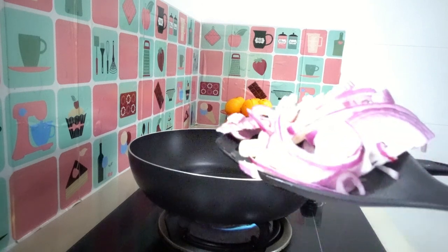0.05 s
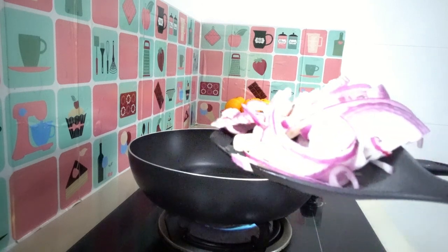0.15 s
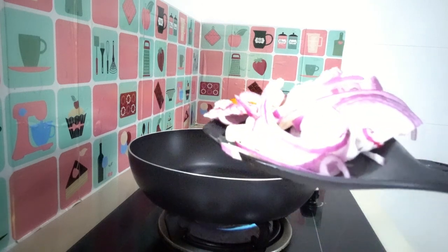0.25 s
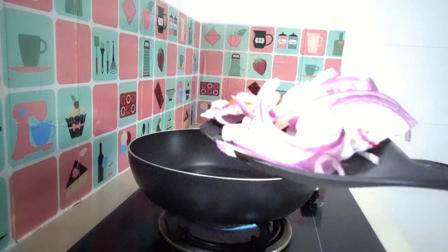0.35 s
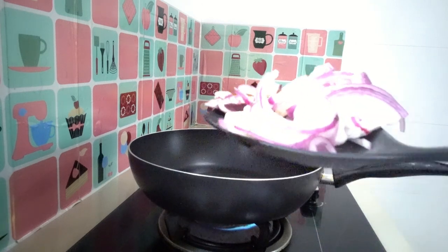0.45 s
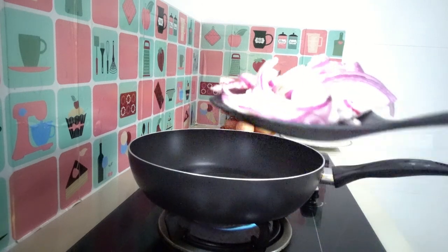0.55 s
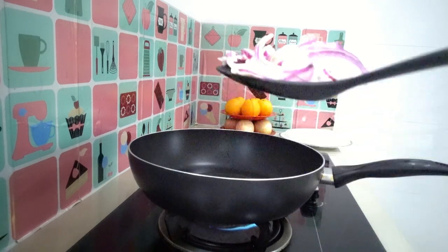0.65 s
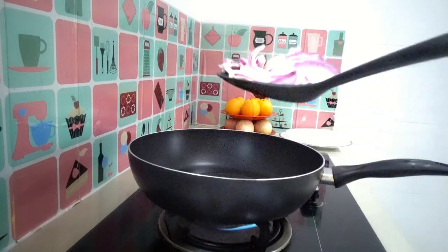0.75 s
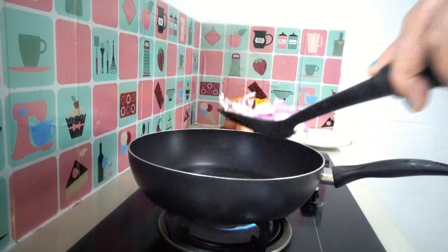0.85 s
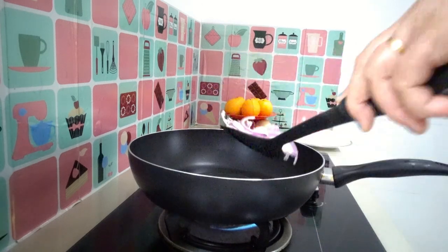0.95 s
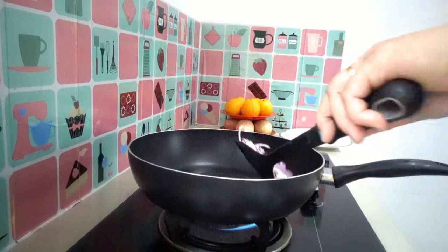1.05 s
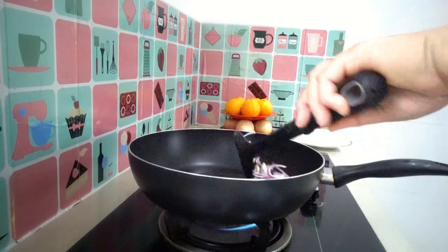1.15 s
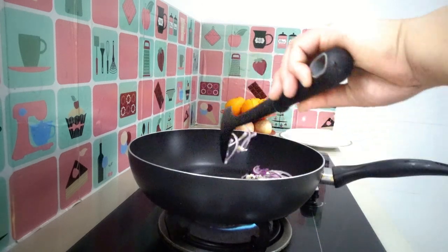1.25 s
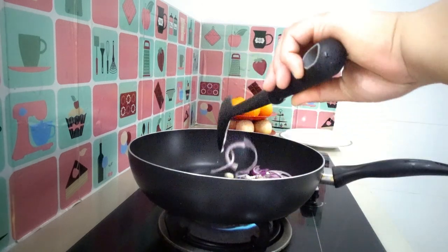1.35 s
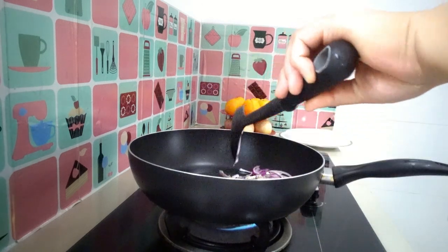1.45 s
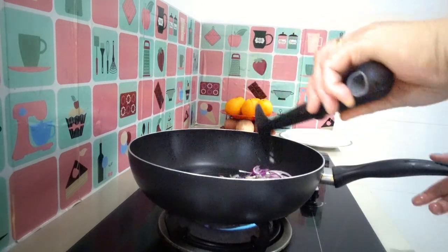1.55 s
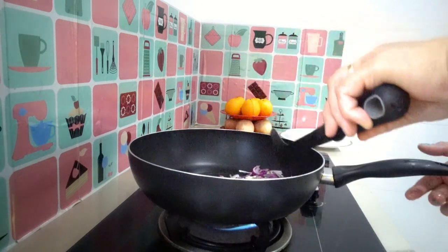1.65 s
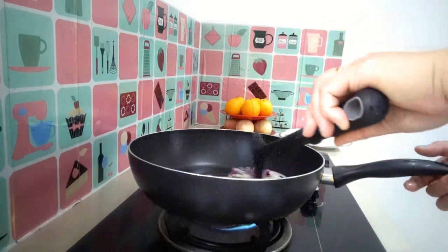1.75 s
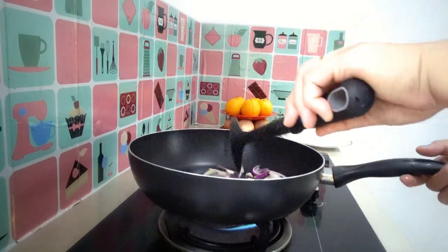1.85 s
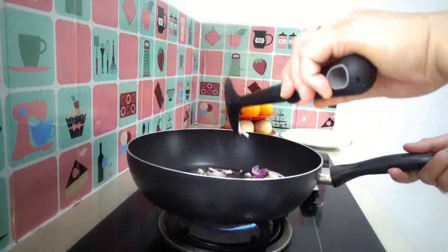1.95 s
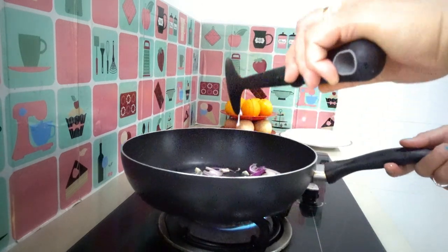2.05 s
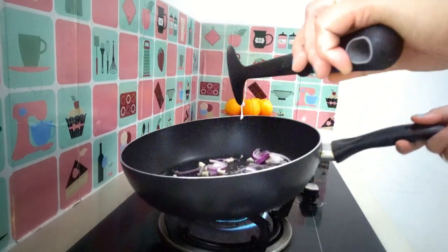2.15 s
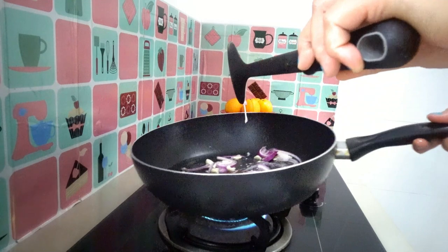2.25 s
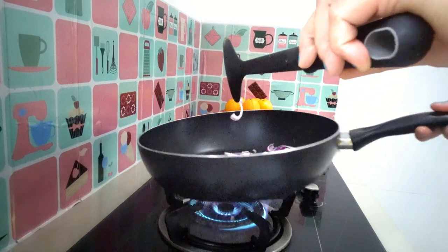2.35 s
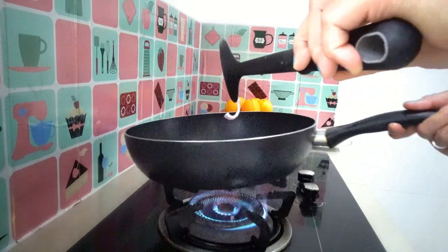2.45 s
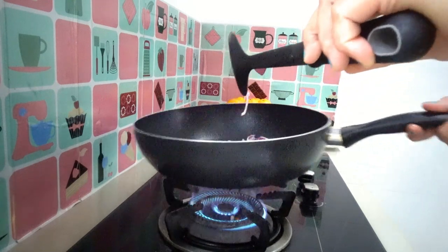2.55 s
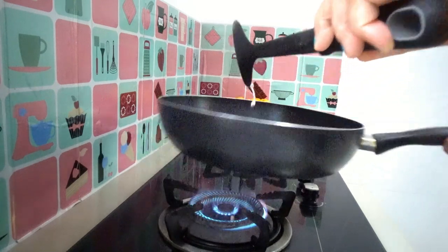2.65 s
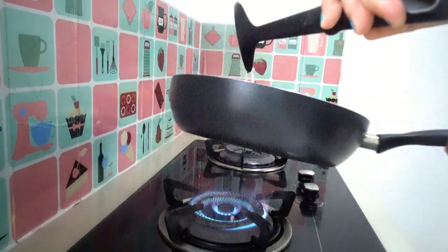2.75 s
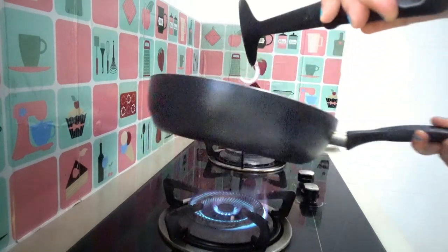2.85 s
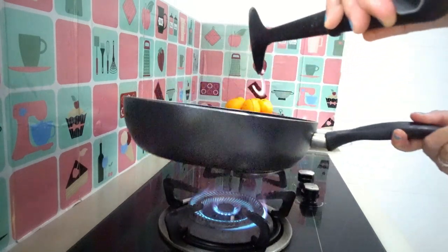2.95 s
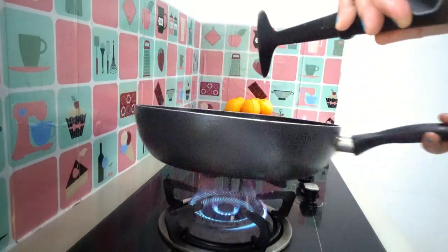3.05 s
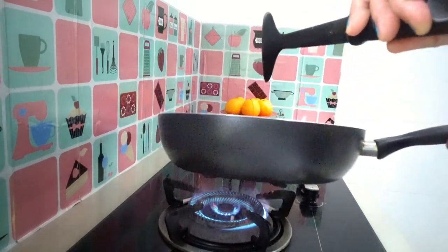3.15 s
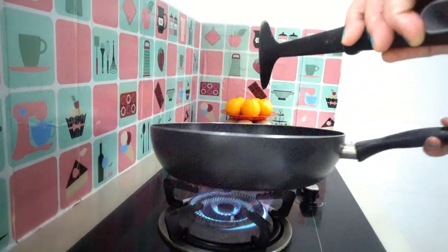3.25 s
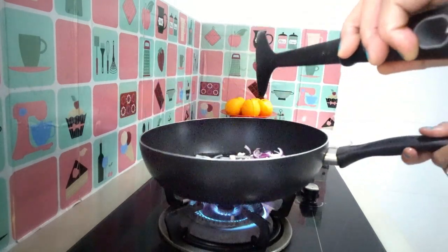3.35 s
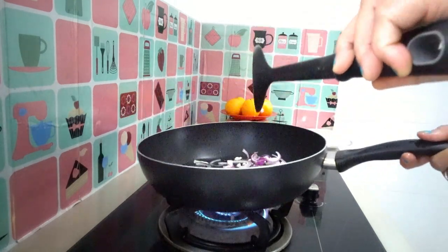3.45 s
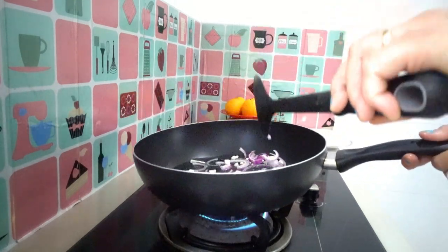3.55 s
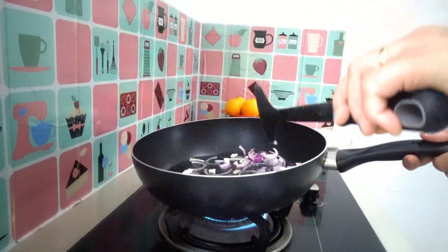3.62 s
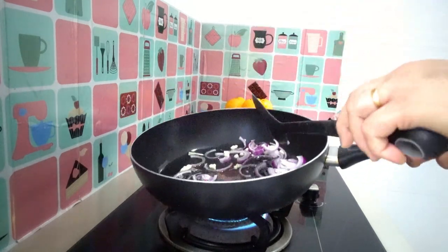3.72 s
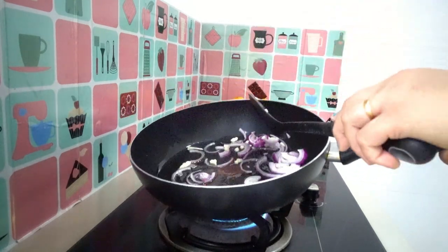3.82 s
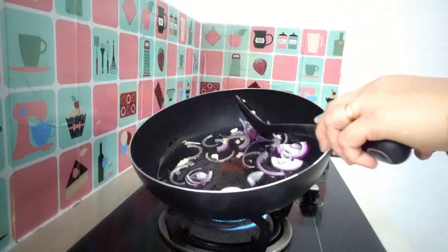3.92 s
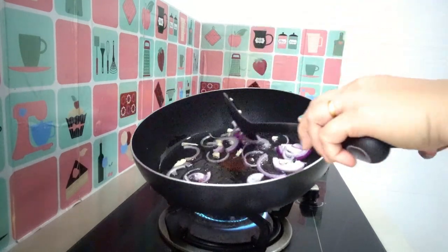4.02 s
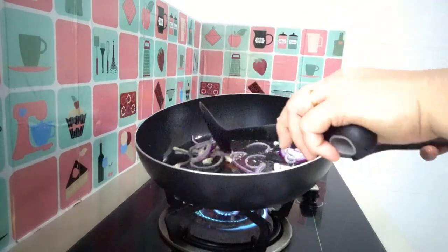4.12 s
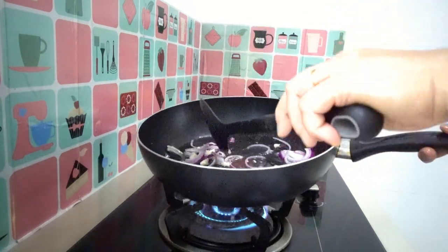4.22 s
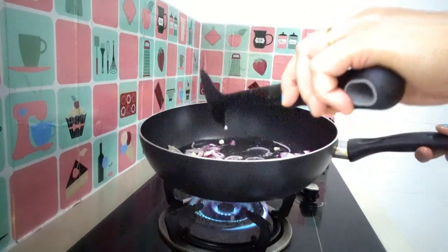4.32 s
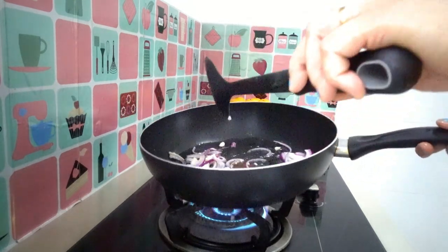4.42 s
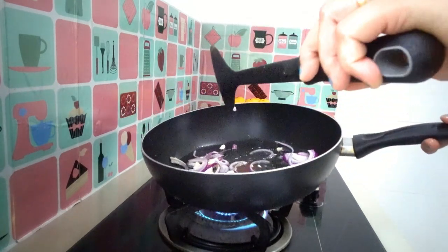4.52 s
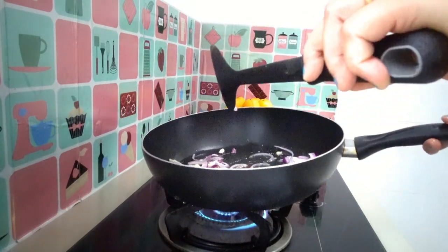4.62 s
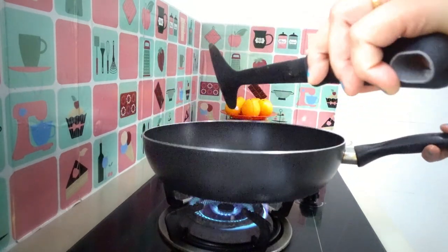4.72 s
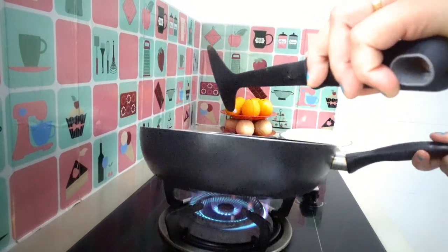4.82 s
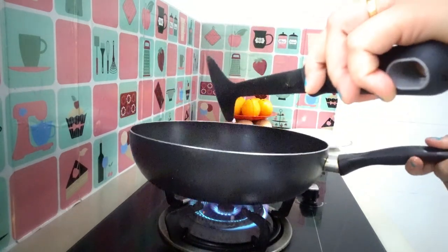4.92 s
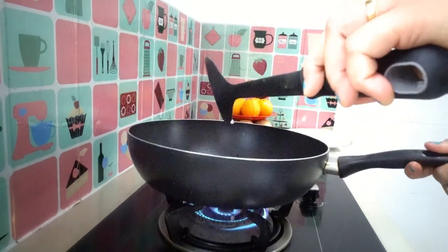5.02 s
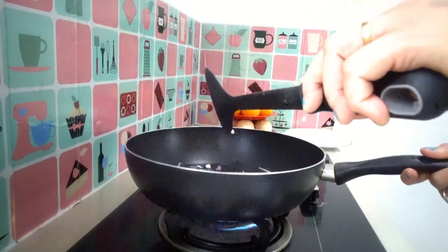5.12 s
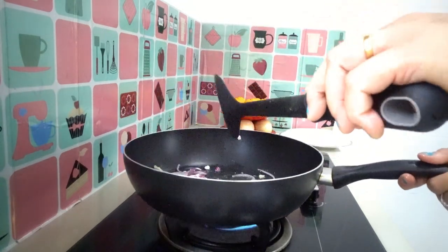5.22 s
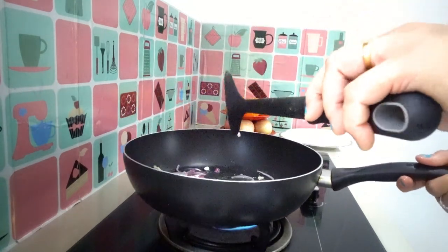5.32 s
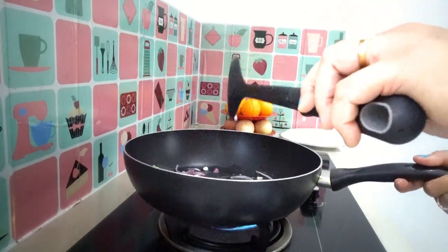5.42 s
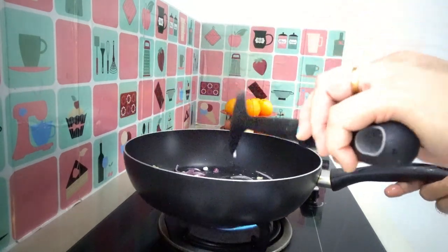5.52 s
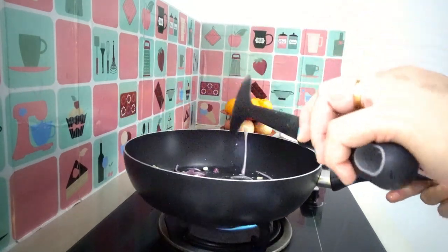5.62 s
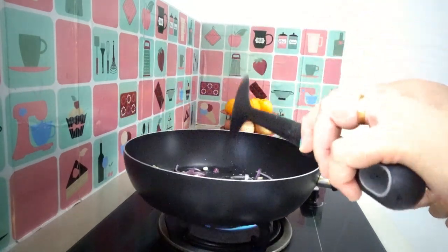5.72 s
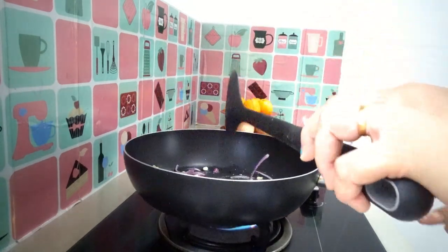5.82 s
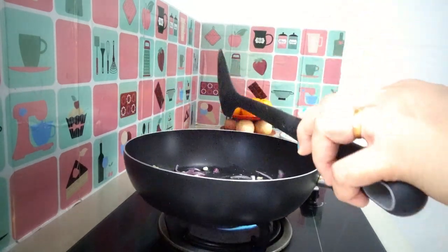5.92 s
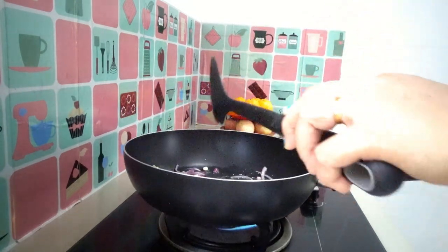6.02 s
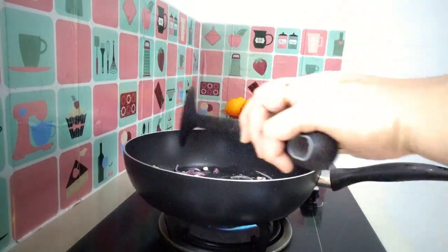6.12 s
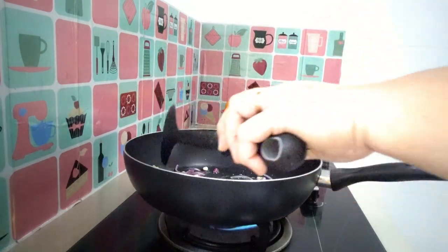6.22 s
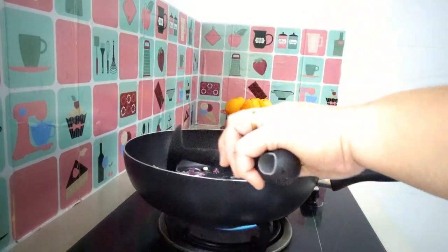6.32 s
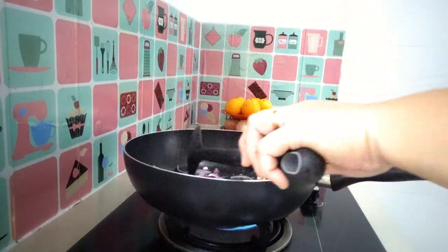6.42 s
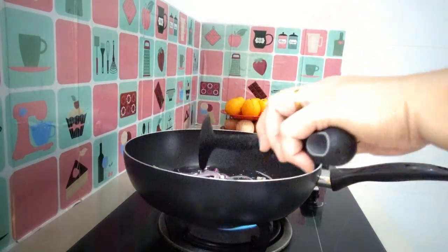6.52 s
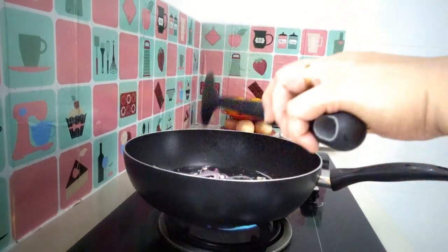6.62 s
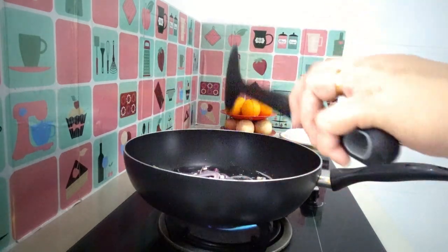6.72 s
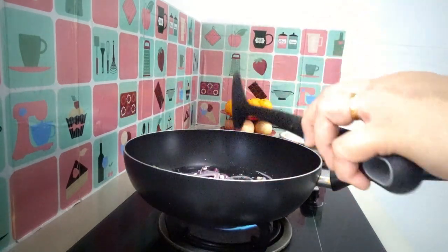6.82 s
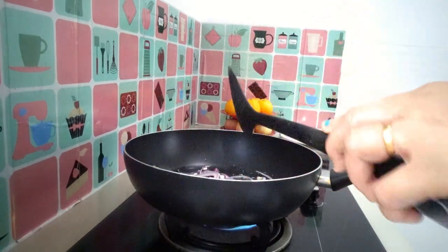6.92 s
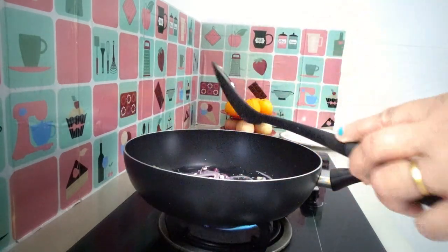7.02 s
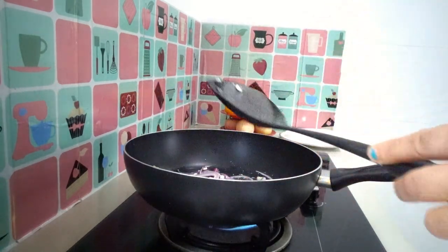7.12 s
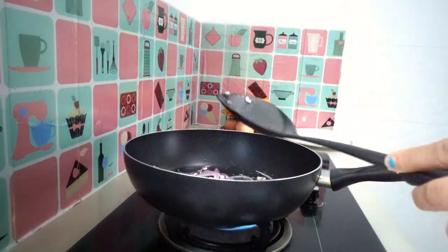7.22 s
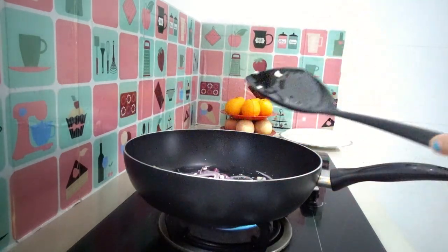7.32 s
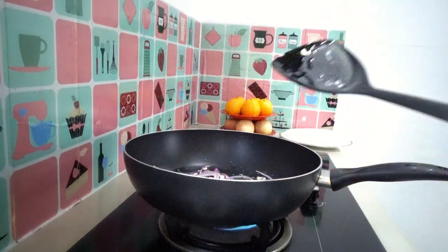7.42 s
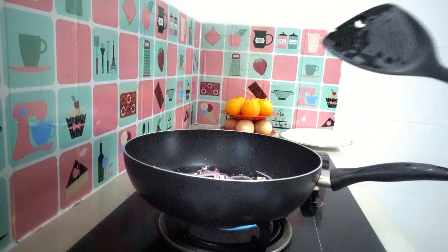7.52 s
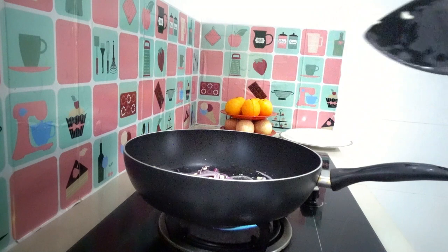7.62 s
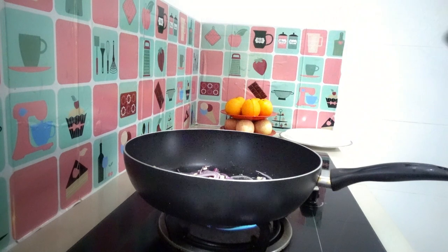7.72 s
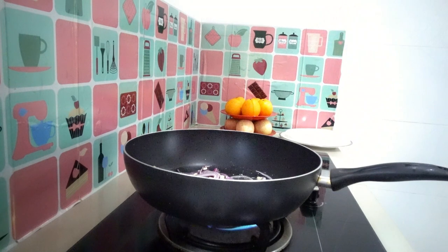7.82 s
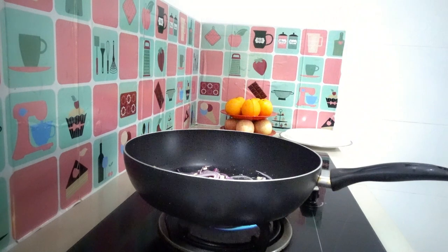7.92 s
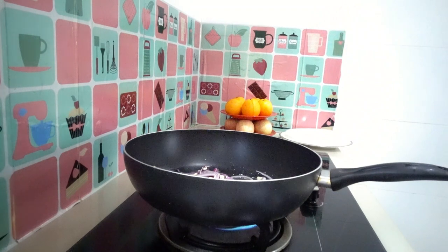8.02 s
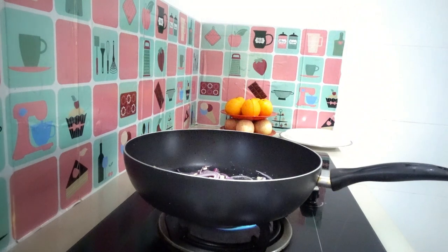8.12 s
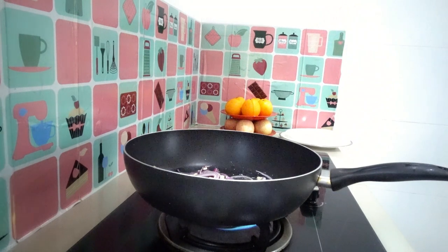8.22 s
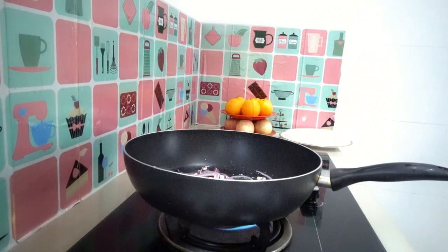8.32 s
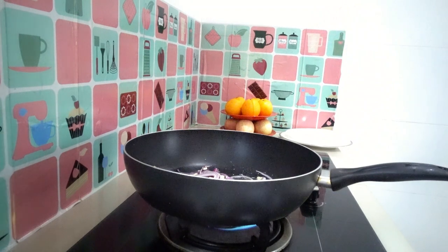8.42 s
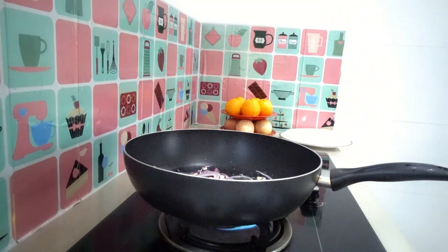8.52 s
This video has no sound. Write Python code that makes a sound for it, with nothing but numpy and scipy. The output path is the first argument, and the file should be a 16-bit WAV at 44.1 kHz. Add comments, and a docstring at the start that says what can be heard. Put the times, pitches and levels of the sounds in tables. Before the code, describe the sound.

A spatula taps a pan, then onion fries with crackling pops as the pan knocks and scrapes on a stove grate.

```python
"""A gas burner rushes softly under the dying echo of a clatter, in a small tiled kitchen.
A spatula raps the pan and drops sliced onion into hot oil; its water boils out, sizzling and spitting
from then on. The pan, lifted to swirl the oil, clatters and skids back on the iron grate four times.
The tiles ring after each blow."""
import sys
import numpy as np
from scipy import signal
from scipy.fft import rfft, irfft, next_fast_len
from scipy.io import wavfile
from scipy.ndimage import uniform_filter1d, minimum_filter1d, map_coordinates

SR = 44100
rng = np.random.default_rng(int(sys.argv[2]) if len(sys.argv) > 2 else 0)


def inscribe(sig):
    """Save sig as 16-bit PCM at rate SR to the path in sys.argv[1].

    A 1-D sig is mono; a 2-D sig holds one channel per row.
    Samples are clipped to [-1, 1] before scaling.
    """
    pcm = np.round(np.clip(np.atleast_2d(sig).T, -1, 1) * 32767)
    wavfile.write(sys.argv[1], SR, pcm.astype(np.int16))


N = 377496

# how hard the onion boils: (time [s], level [dB])
BOIL_CURVE = [(1.15, -46), (1.7, -39.5), (1.93, -31.0), (2.25, -32), (2.95, -34), (3.4, -38), (3.68, -40),
              (3.98, -34), (4.55, -35), (5.3, -36), (6.0, -38), (6.2, -38), (6.32, -39), (6.62, -34.5),
              (7.3, -38), (7.7, -37.5), (8.3, -38.5), (8.55, -36)]
# bursts of sizzle, the first being the noisy wash of the pan strike: (time [s], length [s], level [dB])
SIZZLE_FLURRIES = [(1.105, 0.5, -30.5), (3.023, 0.2, -34.5), (3.91, .18, -46), (4.35, .4, -38.5),
                   (6.403, 0.13, -36), (6.476, 0.14, -30.5), (6.868, .14, -41), (7.414, 0.23, -40),
                   (7.865, 0.17, -37), (8.434, 0.2, -37.5)]
# coarse steam bursts: (frequency [Hz], level [dB])
SPUTTER_SPECTRUM = [(100, -60), (310, -44), (385, -6.5), (490, -13), (550, -23), (720, -5.5), (1130, -5),
                    (1500, -5), (1750, -0.5), (2400, 1.5), (4000, 1), (6000, 0), (9000, -6.5), (16000, -18)]
# fine steam bursts: (frequency [Hz], level [dB])
FIZZ_SPECTRUM = [(1000, -39), (3500, -2.5), (6500, 0.5), (9000, 0.5), (13000, -0.5), (16000, -2.5)]
ONION_IN_S, ONION_RISE_S = 1.11, 0.02

def frying():
    """Water boils out of the onion as coarse sputter and fine fizz; both swell in flurries."""
    t = np.arange(N) / SR
    boil_db = np.interp(t, *np.transpose(BOIL_CURVE))
    excess_db = boil_db - boil_db.mean()
    flurry = np.sqrt(sum((amp(db) * swell(np.maximum(t - s, 0) / length)) ** 2
                         for s, length, db in SIZZLE_FLURRIES))
    # sputter grows less than fizz: a harder boil is brighter
    coarse = np.hypot(amp(boil_db.mean() - 1.5 + 0.76 * excess_db), flurry)
    fine = np.hypot(amp(boil_db + 3), flurry * amp(excess_db + 0.5))
    sputter = coarse * bubbles(SPUTTER_SPECTRUM, per_s=1500, spread_db=2.5, wet_db=7.5)
    fizz = fine * bubbles(FIZZ_SPECTRUM, per_s=4300, spread_db=2.0, wet_db=4.5)
    in_oil = np.clip((t - ONION_IN_S) / ONION_RISE_S, 0, 1)
    flicker = amp(0.96 * wobble(22) + 0.9 * wobble(130))
    return in_oil * flicker * (sputter + fizz)


def bubbles(spectrum, per_s, spread_db, wet_db):
    """Tiny steam bursts of unequal size, in the wash of their own echoes."""
    count = int(per_s * N / SR)
    onsets = rng.integers(0, N, count)
    sizes = amp(spread_db * np.minimum(rng.standard_normal(count), 2.4))
    # each microphone gets its own strength and sign
    bursts = np.array([np.bincount(onsets, sizes * rng.uniform(-1.1, 1, count), N) for _ in range(2)])
    wash = amp(wet_db) * rng.standard_normal((2, N))
    return stereo(unit(bursts) + wash, lambda hz: amp(along(spectrum, hz)))


def swell(age, rise=0.15, fall_db=17):
    """Envelope of a flurry; age and rise are shares of its length."""
    return np.minimum(age / rise, 1) * amp(-fall_db * np.maximum(age - rise, 0))


# loudest drops: (time [s], level [dB], sputter re snap [dB])
LOUD_SPITS = [(3.9262, -17, -7), (4.0166, -19, -0.5), (5.752, -24, 1), (5.8962, -28, 5.5),
              (6.0983, -16.5, -27), (6.1501, -13, -17), (6.408, -13, -12), (6.8628, -14.5, -17),
              (6.889, -20, -0.5), (7.3937, -15, -15), (7.5654, -17.5, -11), (8.021, -15.5, -17)]
# a bursting drop: (frequency [Hz], level [dB])
SNAP_SPECTRUM = [(200, -17), (1500, -13), (4000, -4.5), (9000, -0.5), (16000, 0)]
SMALL_SPITS_PER_S = 4

def spits():
    """Drops burst with a snap and a short spray; small ones come at random."""
    out, t = np.zeros((2, N)), np.arange(SR // 10) / SR
    envelope = 1.5 * blow(t, t60_s=0.016, rise_s=0.0002) + 0.45 * blow(t, t60_s=0.08, rise_s=0.001)
    frying_s = N / SR - ONION_IN_S
    small = [(ONION_IN_S + frying_s * when, -24 - 2 * softness, -3)
             for when, softness in rng.random((int(SMALL_SPITS_PER_S * frying_s), 2))]
    for s, db, sputter_db in LOUD_SPITS + small:
        snap = noise(SNAP_SPECTRUM, len(t))
        sputter = amp(sputter_db + 2.5) * noise(SPUTTER_SPECTRUM, len(t))
        add(out, s, kitchen(amp(db - 8) * envelope * (snap + sputter), wet_db=-3))
    return out


# pan set down: (time [s], thud [dB], clank [dB], clank resonance [Hz], ring [dB])
PAN_KNOCKS = [(2.103, -27.5, -19.5, 1110, -38), (2.153, -18, -21, 1150, -33), (3.473, -19, -14, 1980, -38),
              (3.512, -17.5, -16, 1230, -25), (3.558, -22.5, -19, 1280, -42),
              (3.633, -23.5, -22.5, 1160, -37), (4.847, -17, -11.5, 1460, -18.5),
              (4.904, -24, -15.5, 1480, -41), (5.211, -21.5, -12, 1410, -48),
              (5.247, -15.5, -19.5, 1090, -22.5), (5.423, -28.5, -26, 1180, -48),
              (6.887, -50, -39, 820, -60)]
GRATE_LAG_S = 0.0095

def clatter():
    """Every knock is double: pan on grate, then loose grate on hob."""
    out = np.zeros((2, N))
    for s, thud_db, clank_db, clank_hz, ring_db in PAN_KNOCKS:
        on_grate = contact(thud_db, clank_db, clank_hz, ring_db)
        on_hob = contact(thud_db - 1.5, clank_db - 1, clank_hz, ring_db - 1)
        add(out, s, kitchen(on_grate, wet_db=-1.5))
        add(out, s + GRATE_LAG_S, kitchen(on_hob, wet_db=-1.5))
    return out


# thumped hob: (frequency [Hz], level [dB])
THUD_SPECTRUM = [(25, -2), (90, -39), (180, -12.5), (300, -0.5), (400, 1), (485, 3.5), (560, -6.5),
                 (650, 3), (880, -4.5), (1120, -3.5), (1600, -4), (5000, -42)]
# loose grate: (frequency [Hz], level [dB])
CLANK_SPECTRUM = [(100, -42), (500, -25), (900, -2), (1130, -6), (1700, -5), (2400, -2), (2750, -5.5),
                  (3200, -6), (5000, -7.5), (7300, -11.5), (10000, -19.5), (16000, -33)]
# ringing iron: (frequency [Hz], level [dB], t60 [s])
GRATE_MODES = [(1990, -10, 0.062), (2430, -16, 0.17), (3108, -8, 0.5), (3698, 1.5, 0.2), (4550, -4, 0.081),
               (4740, 0, 0.063)]

def contact(thud_db, clank_db, clank_hz, ring_db):
    """One contact thumps the hob, clanks the grate and leaves its iron ringing."""
    t = np.arange(SR // 3) / SR
    thud = amp(thud_db + 4) * blow(t, t60_s=0.066, rise_s=0.0014) * noise(THUD_SPECTRUM, len(t))
    iron = stereo(rng.standard_normal((2, len(t))),
                  lambda hz: amp(along(CLANK_SPECTRUM, hz)) * (1 + 3.46 * resonance(hz, clank_hz, 115)))
    clank = amp(clank_db + 5.5) * blow(t, t60_s=0.046, rise_s=0.0012) * iron
    return thud + clank + amp(ring_db) * ring(GRATE_MODES, t, waver=0.0052)


# pan sliding on the grate: (time [s], length [s], rasp [dB], resonance [Hz], width [Hz], chatter [dB])
PAN_SKIDS = [(2.04, 0.11, -33.5, 456, 400, -59), (3.535, 0.23, -31.5, 1260, 300, -22),
             (4.871, 0.14, -22, 1546, 240, -18), (5.04, .15, -34, 1505, 160, -34),
             (5.299, 0.21, -40, 1250, 350, -23.5)]
SLIPS_PER_S, CHATTER_GAP_S, CHATTER_FADE_DB_PER_S = 600, 0.027, 38

def skids():
    """The pan sticks and slips along the iron and rocks from prong to prong, ever more weakly."""
    out = np.zeros((2, N))
    for s, length_s, rasp_db, centre_hz, width_hz, chatter_db in PAN_SKIDS:
        n = int(length_s * SR)
        friction = rng.standard_normal((2, n))
        slips = rng.random(n) < SLIPS_PER_S / SR
        rasp = stereo(friction * (0.5 + 10 * slips), lambda hz: resonance(hz, centre_hz, width_hz) ** 2)
        add(out, s, kitchen(amp(rasp_db) * rasp * signal.windows.tukey(n, 0.5), wet_db=-10.5))
        for age_s in np.arange(0, length_s, CHATTER_GAP_S):
            db = chatter_db - CHATTER_FADE_DB_PER_S * age_s + rng.normal(0, 2.6)
            rock = contact(thud_db=db - 9.5, clank_db=db, clank_hz=centre_hz, ring_db=db - 27)
            jitter_s = CHATTER_GAP_S * rng.random() / 2
            add(out, s + age_s + jitter_s, kitchen(rock, wet_db=1))
    return out


# spatula and onion on the pan: (time [s], ring [dB], crack [dB], roll-off [Hz])
PAN_TAPS = [(1.112, -14.5, -18.5, 10000), (1.378, -22, -15, 900), (1.401, -37, -21.5, 6000),
            (1.520, -60, -29, 4000), (1.824, -27.5, -54, 553), (3.116, -31.5, -31, 910)]
# ringing pan: (frequency [Hz], level [dB], t60 [s])
PAN_MODES = [(525.5, -5.5, 0.13), (568, -9.5, 0.096), (778.5, -10.5, 0.26), (1129, -4.5, 0.088),
             (1364, -18, 0.15), (1856, 2, 0.24), (1912, -7, 0.18), (2350, -10, 0.25), (2580, -17, .3),
             (3333, -7, 0.39), (3440, -19, 0.22), (4860, -13.5, .25), (5780, -20, .3), (6480, -17, 0.38),
             (7180, -18, 0.27)]
# crack of a tap: (frequency [Hz], level [dB])
CRACK_SPECTRUM = [(100, -61), (500, -1), (1500, -6), (2300, 1), (2750, -4), (3300, -0.5), (7000, -2.5),
                  (11000, -3.5), (16000, -25)]

def spatula():
    """Taps ring the thin pan, which radiates little bass; each has its own brightness, dull or sharp."""
    out, t = np.zeros((2, N)), np.arange(SR // 2) / SR
    for s, ring_db, crack_db, rolloff_hz in PAN_TAPS:
        modes = amp(ring_db) * ring(PAN_MODES, t, waver=0.0079)
        crack = amp(crack_db) * blow(t, t60_s=0.083, rise_s=0.0003) * noise(CRACK_SPECTRUM, len(t))
        band = signal.butter(2, [250, rolloff_hz], "bandpass", fs=SR)
        add(out, s, kitchen(signal.lfilter(*band, modes + crack), wet_db=-5))
    return out


# gas flame: (frequency [Hz], level [dB])
FLAME_SPECTRUM = [(30, -40), (75, -40), (112, -17), (180, -7.5), (300, -7), (400, -4), (750, -1),
                  (1050, -3.5), (2100, -8.5), (3000, -11.5), (3900, -18), (7000, -19.5), (9000, -27),
                  (16000, -34)]
# burner hum and jet whistle: (frequency [Hz], width [Hz], level [dB])
JET_PEAKS = [(486, 24, 8), (6164, 30, -4), (6900, 450, -4.5)]

def burner():
    """The flame's steady rush, its hum and the thin whistle of its jet."""
    jet = stereo(rng.standard_normal((2, N)), lambda hz: sum(
        amp(db) * resonance(hz, centre, width) ** 2 for centre, width, db in JET_PEAKS))
    return amp(-49) * noise(FLAME_SPECTRUM, N) + amp(-57) * jet


def fading_echo(t60_s=1.46):
    """The room still rings from a clatter a moment earlier."""
    t = np.arange(N) / SR
    spectrum = [(110, -9), (250, -11), (550, -3), (1100, -8), (2100, -2), (4500, -16.5), (15000, -35)]
    return amp(-38 - 60 * t / t60_s) * noise(spectrum, N)


# decay of the tiled room: (frequency [Hz], t60 [s])
TILE_DECAY = [(150, 1), (500, 0.98), (1500, 1.0), (4000, 0.92), (8000, 0.51), (15000, 0.24)]

def kitchen(sound, wet_db):
    """A sound plus the echo of the tiled walls; the treble dies first."""
    wash = stereo(rng.standard_normal((2, SR)), np.ones_like)
    hz, t, bands = signal.stft(wash, SR, nperseg=256)
    decay = blow(t, t60_s=along(TILE_DECAY, hz)[:, None], rise_s=0.001)
    tail = signal.istft(bands * decay, SR, nperseg=256)[1]
    response = amp(wet_db) * tail / np.linalg.norm(tail[0])
    response[:, 0] = 1  # direct path
    return signal.fftconvolve(sound, response, axes=1)


# likeness of left and right: (frequency [Hz], correlation [ratio])
MIC_COHERENCE = [(200, 0.99), (550, 1), (1200, 0.99), (2400, 0.7), (4800, 0.26), (11000, 0.12),
                 (15000, 0.31)]

def stereo(pair, gain):
    """Colour two unrelated signals and mix them as two close microphones hear them; rms 1."""
    n = pair.shape[1]
    m = next_fast_len(n, True)
    hz = np.fft.rfftfreq(m, 1 / SR)
    angle = np.arccos(along(MIC_COHERENCE, hz)) / 2
    mid, side = irfft(rfft(pair, m) * gain(hz) * [np.cos(angle), np.sin(angle)], m)[:, :n]
    return unit(np.array([mid + side, mid - side]))


def noise(spectrum, n):
    """Stereo noise with a given spectrum."""
    return stereo(rng.standard_normal((2, n)), lambda hz: amp(along(spectrum, hz)))


def ring(modes, t, waver):
    """Modes struck at new strengths; shifting contact makes their pitch waver."""
    drift = waver * np.cumsum(rng.standard_normal((len(modes), len(t))), axis=1)
    out = np.zeros(len(t))
    for (hz, db, t60_s), turns in zip(modes, drift):
        envelope = amp(db + rng.normal(0, 1)) * blow(t, t60_s, rise_s=0.0033)
        out += envelope * np.sin(2 * np.pi * (hz * t + turns + rng.random()))
    return out


def blow(t, t60_s, rise_s):
    """Fast rise, then exponential decay."""
    return (1 - np.exp(-t / rise_s)) * amp(-60 * t / t60_s)


def resonance(hz, centre_hz, width_hz):
    """Gain of one resonance, 1 at its centre."""
    return 1 / np.sqrt(1 + ((hz ** 2 - centre_hz ** 2) / (hz * width_hz + 1e-9)) ** 2)


def wobble(knots_per_s):
    """A smooth random curve."""
    knots = rng.standard_normal(int(N * knots_per_s / SR) + 4)
    return map_coordinates(knots, [np.arange(N) * knots_per_s / SR])


def along(points, hz):
    """Interpolate (Hz, value) points on a log axis."""
    knots_hz, values = np.transpose(points)
    return np.interp(np.log(hz + 1), np.log(knots_hz + 1), values)


def amp(db):
    """Decibels to gain."""
    return 10 ** (np.asarray(db) / 20)


def unit(x):
    """Scale to rms 1."""
    return x / np.sqrt(np.mean(x ** 2) + 1e-20)


def add(out, s, sound):
    """Mix a sound in at time s."""
    part = out[:, round(s * SR):][:, :sound.shape[1]]
    part += sound[:, :part.shape[1]]


# lead of the left microphone: (frequency [Hz], phase [rad])
LEFT_LEAD = [(0, -1.34), (1290, 0.89), (3700, 0.72), (8270, 1.28), (12700, -0.26), (16600, 0.77)]
# shading of the left microphone: (frequency [Hz], left minus right [dB])
LEFT_SHADE = [(200, 0.1), (1000, -1.5), (4000, -1.25), (14000, -2.5)]
WALL_DELAY_S = 0.001673  # dips near 300, 900 and 1500 Hz

def scene():
    """All sources with a close wall's reflection, heard from slightly to one side."""
    blows = amp(-1) * (clatter() + skids() + spatula())
    mix = blows + frying() + spits() + amp(-2.5) * (burner() + fading_echo())
    m = next_fast_len(N + SR // 2, True)
    hz = np.fft.rfftfreq(m, 1 / SR)
    reflection = along([(300, 0.61), (1500, 0.055), (3000, 0.078), (6000, 0.019)], hz)
    wall = 1 + reflection * np.exp(-2j * np.pi * hz * WALL_DELAY_S)
    left = amp(along(LEFT_SHADE, hz) / 2) * np.exp(0.5j * along(LEFT_LEAD, hz))
    return irfft(rfft(mix, m) * wall * [left, 1 / left], m)[:, :N]


LOW_CUT_HZ, TOP_HZ, LIMITER_CEILING = 150, 15950, 0.56

def record(dry):
    """The microphone cuts the bass, a limiter holds the loudest blows, the top treble is cut off."""
    thin = signal.sosfilt(signal.butter(3, LOW_CUT_HZ, "highpass", fs=SR, output="sos"), dry)
    needed = np.minimum(1, LIMITER_CEILING / (np.abs(thin).max(axis=0) + 1e-9))
    gain = uniform_filter1d(minimum_filter1d(needed, size=600), size=400)
    m = next_fast_len(N + SR // 2, True)
    passband = np.fft.rfftfreq(m, 1 / SR) < TOP_HZ
    return irfft(rfft(thin * gain, m) * passband, m)[:, :N]


dry = scene()
out = record(dry)
inscribe(out)
```